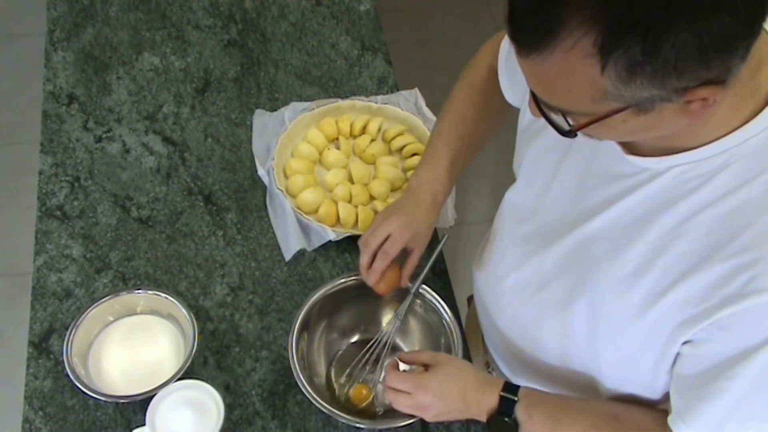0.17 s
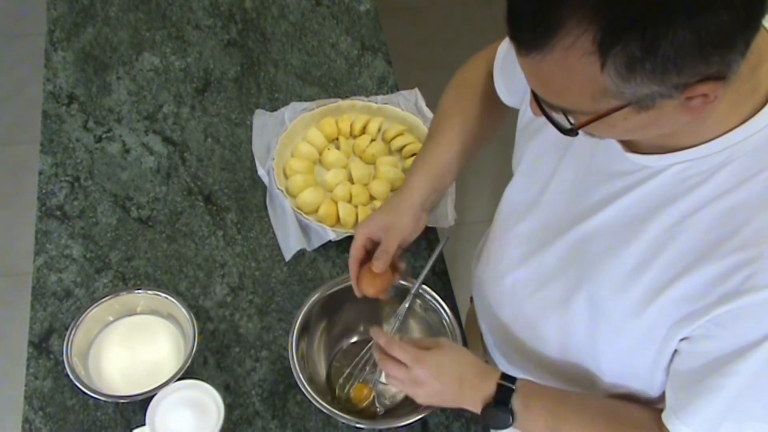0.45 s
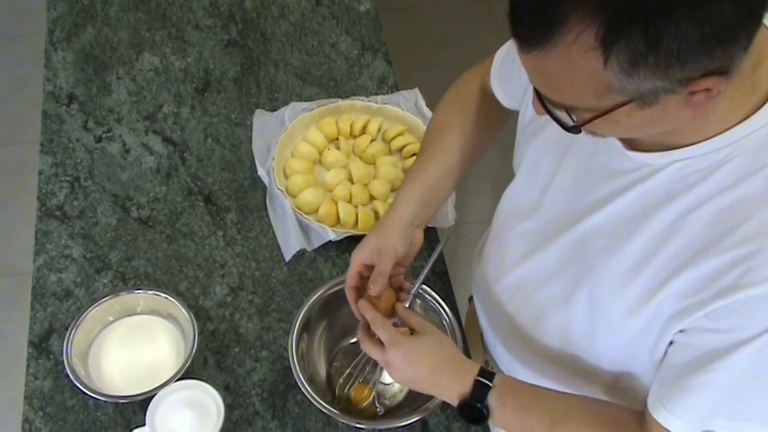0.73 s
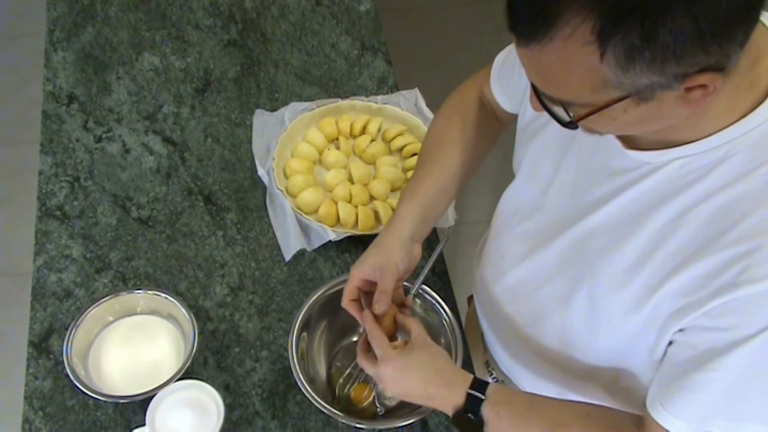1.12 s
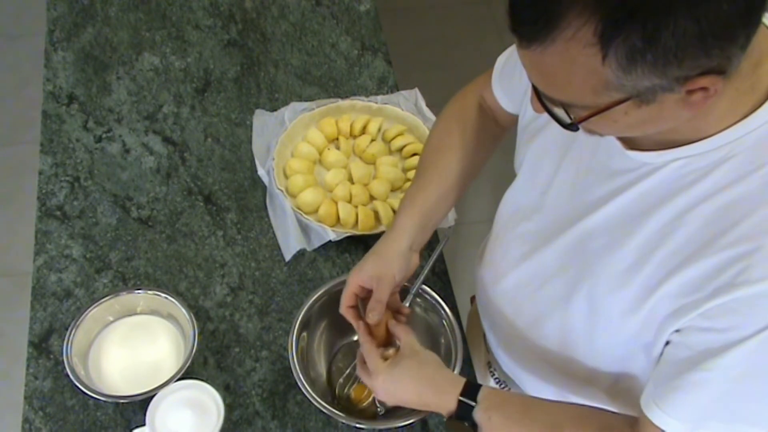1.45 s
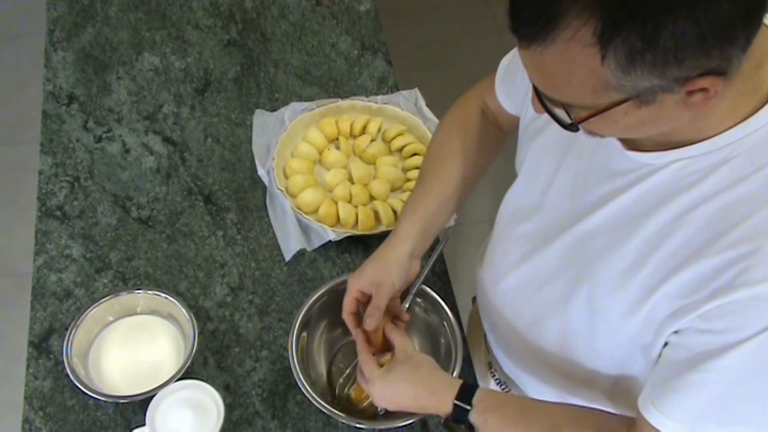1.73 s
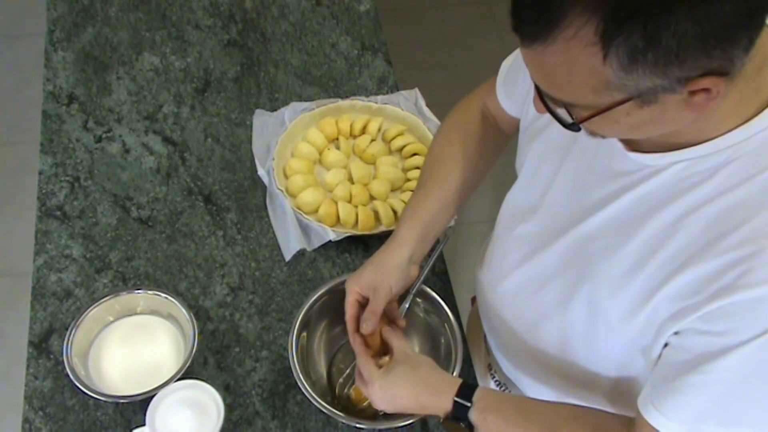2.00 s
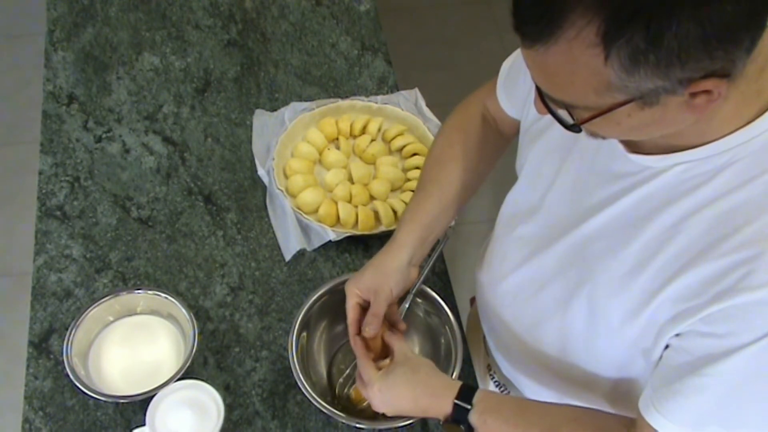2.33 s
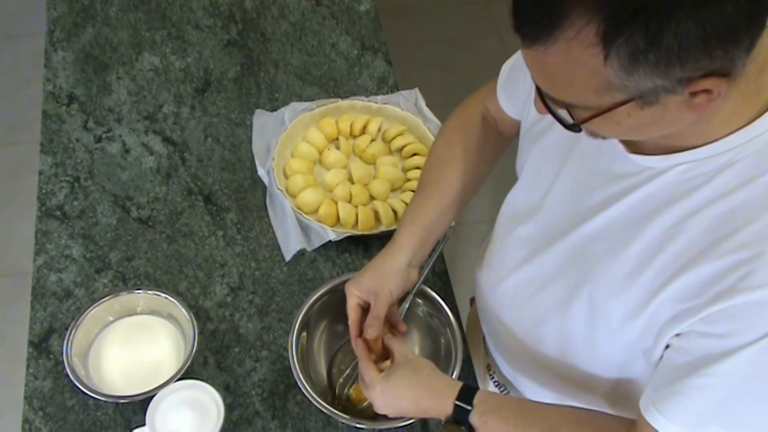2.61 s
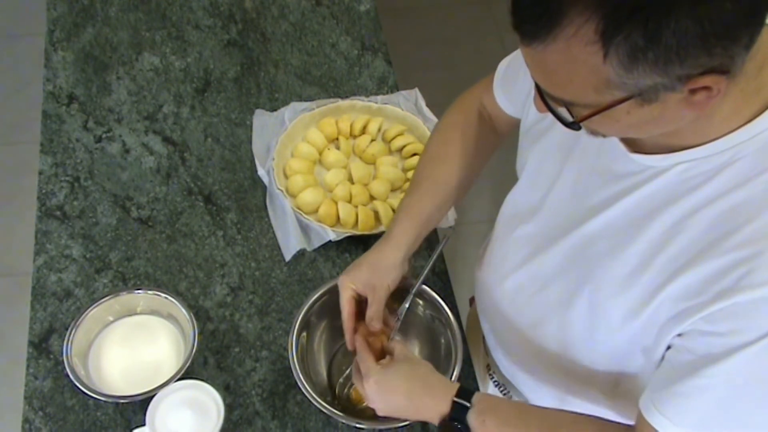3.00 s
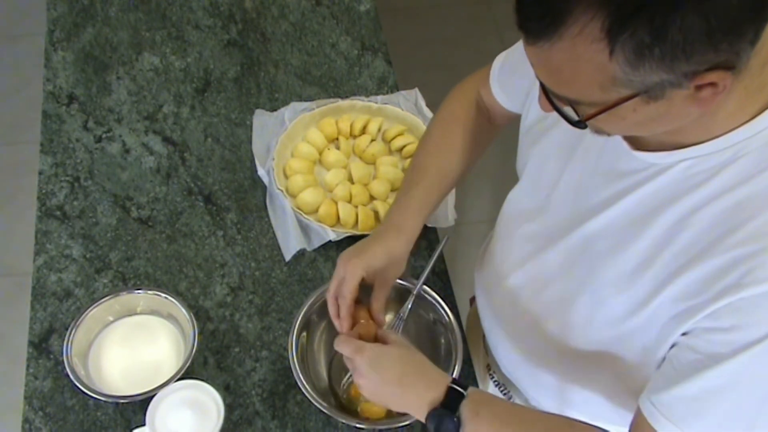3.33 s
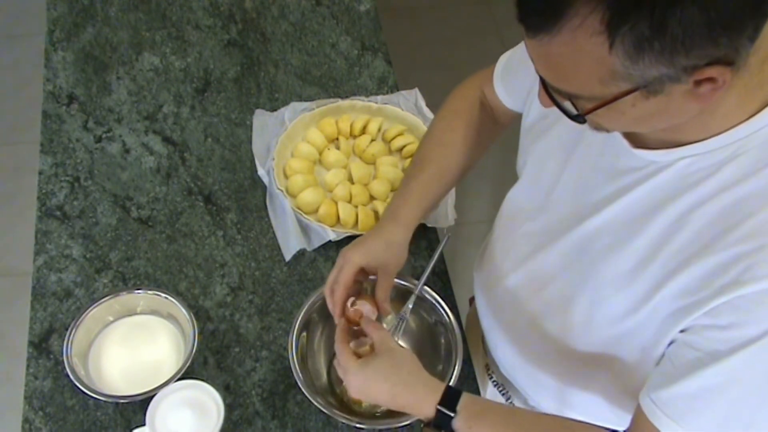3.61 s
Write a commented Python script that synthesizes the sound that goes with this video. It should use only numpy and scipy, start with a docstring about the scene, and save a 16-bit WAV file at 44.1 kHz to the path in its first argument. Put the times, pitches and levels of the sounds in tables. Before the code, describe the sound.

An eggshell crunches once against a steel bowl, whose ring is soon damped by a hand. Fingers pull the shell apart with quiet crackles that grow busier and sharper, over faint room noise in a hard-walled kitchen.

```python
"""Cracking an egg on a steel bowl

An egg is knocked on the rim in a hard-walled kitchen, while a lighter tap still rings out.
The shell caves in with a short crunch and the bowl rings. Thumbs then prise the shell open: small
fractures snap and sound the egg's hollow, each echoed by the stone counter, over quiet room noise."""
import sys
import numpy as np
from scipy import signal
from scipy.fft import rfft, irfft, next_fast_len
from scipy.io import wavfile

SR = 44100
rng = np.random.default_rng(int(sys.argv[2]) if len(sys.argv) > 2 else 0)


def dump_mix(stems):
    """Bounce the given channels to the path in sys.argv[1] as a 16-bit WAV at rate SR."""
    frames = np.atleast_2d(stems).T  # one column per channel
    limited = np.clip(frames, -1, 1)  # hard clip at full scale
    pcm = np.round(limited * 32767).astype(np.int16)
    wavfile.write(sys.argv[1], SR, pcm)


N = 165375
LEAD = int(.3 * SR)  # pre-roll that holds the light tap
TIME = np.arange(-LEAD, N) / SR
CUTOFF_HZ = 16000


def from_db(db):
    """Decibels to gain."""
    return 10 ** (np.asarray(db) / 20)


def at_hz(curve, hz):
    """Read a curve on a log-frequency axis."""
    f, value = np.transpose(curve)
    return np.interp(np.log(np.maximum(hz, 1)), np.log(f), value)


def normalise(x, seconds):
    """Scale x to the energy of a sound of rms 1 that lasts so long."""
    return x * np.sqrt(seconds * SR / (np.sum(x ** 2) + 1e-20))


def eq(x, curve):
    """Minimum-phase EQ that follows a curve in dB."""
    size = 2 * next_fast_len(len(x) // 2 + 2048)
    cepstrum = irfft(np.log(from_db(at_hz(curve, np.fft.rfftfreq(size, 1 / SR)))))
    cepstrum[1:size // 2] *= 2
    cepstrum[size // 2 + 1:] = 0
    return irfft(rfft(x, size) * np.exp(rfft(cepstrum)))[:len(x)]


def resonate(x, hz, width_hz):
    """Resonant band-pass with unity gain at its peak."""
    r = np.exp(-np.pi * width_hz / SR)
    feedback = [1, -2 * r * np.cos(2 * np.pi * hz / SR), r * r]
    return signal.lfilter(np.array([1, 0, -1]) * (1 - r * r) / 2, feedback, x + 1e-18)


def grains(size, per_s, spread_db=3):
    """Random clicks of uneven strength and polarity."""
    strength = from_db(spread_db * np.minimum(rng.exponential(1, size), 3))
    return (rng.random(size) < per_s / SR) * strength * rng.choice([-1, 1], size)


def pan(db):
    """Left and right gains; positive dB leans left."""
    gains = from_db(np.array([[db], [-db]]) / 2)
    return gains / gains.mean()


# Room tone EQ: f/Hz, level/dB
ROOM_TONE_EQ = [(18, -49), (30, -12), (90, 0.5), (189, 0.5), (252, -6.5), (303, 0), (526, -0.5),
                (584, -1.5), (1040, -9), (1350, -4), (1810, -12), (2410, -6.5), (4080, -15.5),
                (5900, -14.5), (16000, -25)]
# Room tone width: f/Hz, side minus mid/dB
ROOM_TONE_WIDTH = [(100, -21), (290, -9.5), (640, -2.5), (3000, 0.5), (15000, -9)]

def room_tone():
    """A quiet, steady bed of dark noise, nearly mono in the bass."""
    mid, side = (normalise(eq(rng.standard_normal(len(TIME)), ROOM_TONE_EQ), len(TIME) / SR)
                 for _ in range(2))
    return from_db(-56.5) * (mid + eq(side, ROOM_TONE_WIDTH) * [[1], [-1]])


# Hits on the rim, light tap then knock: t/s, pre-mix levels of shell/dB, crunch/dB, thump/dB
HITS = [(-.2, -29.5, -30.5, -25.5), (.115, -19, -20, -19.5)]
# The egg's modes on the harder hit: f/Hz, level/dB, t60/s
EGG_MODES = [(585, -38, 0.033), (1320, -9, 0.044), (1800, -24, .02), (2960, -19.5, 0.017),
             (6300, -33, .012), (7070, -17.5, 0.065), (7900, -22, 0.032)]

def contact():
    """The attack: the egg meets the rim and ticks with its own short modes."""
    onsets, shell_db = np.transpose(HITS)[:2]
    ages = np.maximum(TIME - onsets[:, None], 0)
    ticks = sum(from_db(db - 60 * np.minimum(ages / t60, 3)) * np.sin(2 * np.pi * hz * ages)
                for hz, db, t60 in EGG_MODES)
    return from_db(shell_db - shell_db.max()) @ ticks


# Midrange body of the caving shell: f/Hz, level/dB
SHELL_EQ = [(100, -37), (400, -30), (900, -8), (1130, -3.5), (1310, 4), (1560, -7.5), (1900, 4),
            (2250, -11), (2550, -2.5), (3300, -22), (5000, -41)]
# Its crisp top: f/Hz, level/dB
CRUNCH_EQ = [(2000, -12), (3600, -12), (5000, -10.5), (6000, -3.5), (7300, 2), (8200, -6), (9200, -10.5),
             (12000, -20), (15500, -49)]
# Its low-end weight: f/Hz, level/dB
THUMP_EQ = [(35, -57), (60, -43), (85, -16), (125, 0), (195, -9.5), (240, -2.5), (310, -2), (400, -2),
            (520, 4), (720, 2.5), (950, -4), (1600, -28)]

def crush(curve, level_column):
    """One layer of the rim sinking into the shell: a dense run of breaks that swells, then stops."""
    swell_s, release_s = .071, .01
    out = 0
    for hit in HITS:
        age = TIME - hit[0]
        force = np.interp(age, [0, swell_s], [.71, 1], left=0)
        force *= np.exp(-np.maximum(age - swell_s, 0) / release_s)
        breaks = force * grains(len(TIME), per_s=1800, spread_db=3.5)
        out = out + from_db(hit[level_column]) * normalise(eq(breaks, curve), swell_s / 2)
    return out


# The steel bowl's modes, struck at two spots: f/Hz, tap level/dB, knock level/dB, t60/s
BOWL_MODES = [(612, -35, -32.5, 1.13), (695, -32, -35, 0.87), (761.5, -32, -28.5, 0.9),
              (1054, -29.5, -35.5, 1.13), (1258, -38.5, -38.5, 1.24), (1342, -44, -37, 1.3),
              (1822, -52, -55, 0.62), (1967, -59, -25.5, 0.88), (1975, -51, -28, 1.3),
              (2516, -51, -30, 1.1), (2605, -48, -42, 2.8), (3030, -39.5, -39.5, .85),
              (3055, -49, -32, 0.7), (3500, -49, -39, 0.95), (4110, -46, -53, 0.61), (4885, -36, -37, 0.38),
              (5670, -48, -51, 0.4)]

def bowl():
    """Each mode blooms during the crush and beats with a weaker twin as it dies."""
    attack_s, beat_hz, twin_db = .046, 11.97, -4
    out = np.zeros(len(TIME))
    for hit, (onset, *_) in enumerate(HITS):
        age = TIME[TIME > onset] - onset
        attack = 1 - np.exp(-age / attack_s)
        for hz, *hit_db, t60 in BOWL_MODES:
            detune_hz = beat_hz * rng.uniform(.525, 1.566) * rng.choice([-1, 1])
            phase = 2 * np.pi * rng.random()
            mode = np.sin(2 * np.pi * hz * age)
            twin = from_db(twin_db) * np.sin(2 * np.pi * (hz + detune_hz) * age + phase)
            out[TIME > onset] += (mode + twin) * from_db(hit_db[hit] - 60 * age / t60) * attack
    return out


TOUCH_S = .577

def bowl_note():
    """One note of the bowl swells briefly and is choked."""
    full_s, hz = .522, 1978
    swell = np.interp(TIME, [full_s - .02, full_s, TOUCH_S - .006, TOUCH_S + .007], [0, 1, 1, 0])
    return from_db(-33) * swell * np.sin(2 * np.pi * hz * TIME)


def hand_damping():
    """Gain that ducks the bowl's ring as a hand comes to rest on it."""
    return from_db(np.interp(TIME, [TOUCH_S, TOUCH_S + .014], [0, -7.5]))


# Fader ride of fingers shifting on the shell: t/s, level/dB
RUB_RIDE = [(.55, -58), (.82, -62.5), (1.05, -70), (1.22, -71), (1.28, -52), (1.33, -62.5), (1.68, -66),
            (1.745, -54), (1.8, -65), (1.93, -76), (1.975, -57.5), (2.04, -82), (2.4, -66), (2.435, -53),
            (2.5, -67.5), (3.0, -57), (3.3, -52.5), (3.74, -54)]
# Tone of their grit: f/Hz, level/dB
RUB_EQ = [(900, -19.5), (2000, 8.5), (3500, 2.5), (6000, 6), (9000, -3), (15000, -8.5)]

def rubbing():
    """Fingers and shell edges rub with a fine, gritty texture."""
    grit = normalise(eq(grains(len(TIME), per_s=3000), RUB_EQ), len(TIME) / SR)
    return from_db(np.interp(TIME, *np.transpose(RUB_RIDE))) * grit


def counter_echo(x):
    """One quick reflection off the stone counter; its delay varies at random as the hands move."""
    gain, t = from_db(1), np.arange(len(x)) / SR
    delay_s = .0042 * (1 + .1994 * rng.uniform(-.991, 1))
    return (x + gain * np.interp(t - delay_s, t, x, left=0)) / np.hypot(1, gain)


# Shell fracture cues: t/s, length/s, hollow level/dB, hollow f/Hz, snap level/dB, snap f/Hz
FRACTURES = [(.835, 0.0017, -41.5, 2400, -55, 5600), (.926, 0.013, -41, 1920, -52.5, 5930),
             (1.015, 0.024, -37.5, 1620, -48, 5800), (1.376, 0.0013, -49.5, 1450, -56.5, 5900),
             (1.4865, 0.0098, -41, 1326, -45, 3360), (1.489, 0.017, -41, 2290, -50, 3320),
             (1.603, 0.0048, -50.5, 1380, -71, 6000), (1.648, 0.0024, -52.5, 1400, -46, 5800),
             (1.895, 0.0042, -50.5, 2160, -68, 5900), (2.133, .002, -53, 1260, -42.5, 7340),
             (2.145, 0.0049, -42, 2370, -38.5, 5900), (2.299, 0.019, -32.5, 2170, -56, 5000),
             (2.329, 0.0024, -38, 2120, -79, 5000), (2.361, 0.025, -46, 1300, -66, 6000),
             (2.383, 0.014, -43.5, 2040, -65, 7000), (2.557, 0.01, -45, 1900, -65, 5870),
             (2.585, .002, -48, 2130, -37.5, 8300), (2.605, 0.0028, -34.5, 2170, -33.5, 7600),
             (2.621, 0.01, -38, 2120, -65, 8000), (2.662, 0.01, -42.5, 2120, -41.5, 6100),
             (2.788, 0.016, -29.5, 2060, -41, 6500), (2.798, 0.0023, -38, 2050, -36.5, 6360),
             (2.813, 0.0031, -31, 2160, -32.5, 3160), (2.939, 0.0056, -54, 2110, -42, 5940),
             (2.955, 0.0026, -33.5, 2160, -35, 8900), (3.013, 0.0025, -45, 2050, -45.5, 7400),
             (3.134, 0.013, -56, 2160, -37.5, 7600), (3.2363, 0.0033, -79, 2400, -43, 7500),
             (3.248, 0.016, -43, 2310, -36, 6900), (3.273, 0.0067, -43.5, 3440, -34.5, 7200),
             (3.339, 0.0093, -42, 2060, -39.5, 6460), (3.357, 0.0044, -54, 2040, -44, 7040),
             (3.423, .012, -37, 2250, -33, 3760), (3.464, 0.0048, -42, 2700, -35.5, 8250),
             (3.473, .004, -41.5, 2150, -39, 3530), (3.502, .035, -49, 3100, -40, 6400),
             (3.5985, 0.0021, -45, 1950, -33, 8500)]
# Tone of the snap: f/Hz, level/dB
SNAP_EQ = [(150, -23), (500, -7.5), (850, -8.5), (1250, 2), (1700, -6), (3300, 6.5), (5000, 4), (6500, 3),
           (10000, 2.5), (13000, -6), (16000, -11)]

def fractures():
    """Each fracture is a spurt of tiny breaks: a bright snap of the shell and the ring of its hollow."""
    out, t = np.zeros(len(TIME)), np.arange(SR // 8) / SR
    for onset, length, hollow_db, hollow_hz, snap_db, snap_hz in FRACTURES:
        breaks = grains(len(t), per_s=7000)
        breaks[0] = 1  # a click right on the cue
        breaks *= np.exp(-(t / length) ** 2 / 2)
        skirt = signal.butter(2, [hollow_hz / 1.92, hollow_hz * 1.92], "band", fs=SR, output="sos")
        hollow = signal.sosfilt(skirt, resonate(breaks, hollow_hz, width_hz=290))
        snap = eq(breaks + 1.9 * resonate(breaks, snap_hz, width_hz=970), SNAP_EQ)
        # Gentle fractures are duller: the low-pass closes an octave per 39 dB.
        top_hz = np.clip(15000 * 2 ** ((snap_db + 35) / 39), snap_hz, CUTOFF_HZ)
        snap = signal.sosfilt(signal.butter(2, top_hz, fs=SR, output="sos"), snap)
        crack = from_db(hollow_db) * normalise(counter_echo(hollow), seconds=.01)
        crack += from_db(snap_db) * normalise(counter_echo(snap), seconds=.01)
        start = LEAD + int(onset * SR)
        out[start:start + len(t)] += crack[:len(out) - start]
    return out


# Decay of the kitchen reverb: f/Hz, t60/s
REVERB_DECAY = [(100, 0.85), (500, 0.99), (2000, 1.063), (4000, 0.87), (7000, 0.78), (11000, 0.45),
                (16000, 0.37)]
# Its width: f/Hz, side minus mid/dB
REVERB_WIDTH = [(100, 6.5), (280, -3), (600, -8), (2000, -12), (7000, -11), (15000, -37)]

def kitchen():
    """Stereo impulse response of the hard walls: it builds up, then dies faster in the treble."""
    build_s = .004
    t = np.arange(int(1.4 * SR)) / SR
    hz, centres = np.fft.rfftfreq(len(t), 1 / SR), np.geomspace(100, 16000, 12)
    noise, tail = rfft(rng.standard_normal((2, len(t)))), 0
    for centre, share in zip(centres, np.eye(len(centres))):
        mid, side = irfft(noise * at_hz(np.c_[centres, share], hz), len(t))
        band = mid + side * from_db(at_hz(REVERB_WIDTH, centre)) * [[1], [-1]]
        tail = tail + band * from_db(-60 * t / at_hz(REVERB_DECAY, centre))
    return normalise(tail * (1 - np.exp(-t / build_s)), 2 / SR)


# Stereo placement of the knock: f/Hz, left minus right/dB
KNOCK_PAN = [(100, 14), (220, 10), (380, 4.5), (700, 4.5), (1300, -.5), (2400, -3), (8000, -1),
             (15000, 1.5)]

def scene():
    """The mix: knock and prising share one reverb; the knock's bass leans left, the prising right."""
    room = kitchen()
    reverb = lambda x: signal.fftconvolve(x[None], room, axes=1)[:, :len(TIME)]
    tick = contact()
    egg = crush(SHELL_EQ, level_column=1) + crush(CRUNCH_EQ, level_column=2)
    thump = crush(THUMP_EQ, level_column=3)
    ring = bowl() * hand_damping()
    direct = tick + egg + ring + bowl_note() + from_db(-9.5) * thump
    send = from_db(-9) * tick + egg + from_db(-.5) * ring + from_db(.5) * thump
    low_cut = signal.butter(2, 103, "high", fs=SR, output="sos")
    knock = signal.sosfilt(low_cut, direct + reverb(send))
    for channel in range(2):
        pan_eq = [(hz, 20 * np.log10(pan(db)[channel, 0])) for hz, db in KNOCK_PAN]
        knock[channel] = eq(knock[channel], pan_eq)
    prising = fractures() + rubbing()
    prising = pan(-2.2) * (prising + from_db(-4) * reverb(prising))
    return (knock + prising + room_tone())[:, LEAD:]


def record(dry):
    """Master chain: a soft clipper rounds the highest peaks, then a steep low-pass trims the top."""
    ceiling = from_db(-6.5)
    rounded = dry / (1 + (dry / ceiling) ** 4) ** (1 / 4)
    return signal.sosfilt(signal.ellip(10, .2, 80, CUTOFF_HZ, fs=SR, output="sos"), rounded)


dry = scene()
out = record(dry)
dump_mix(out)
```